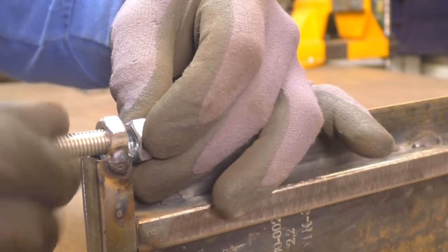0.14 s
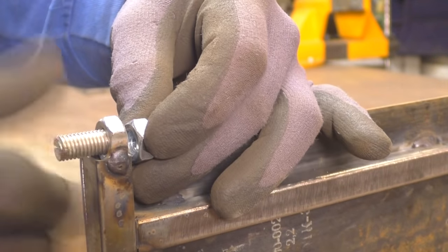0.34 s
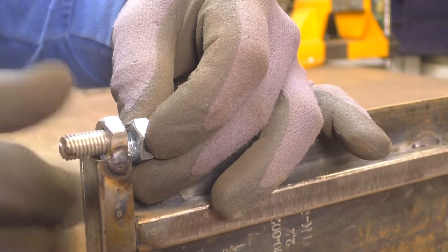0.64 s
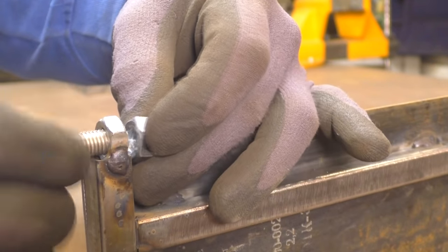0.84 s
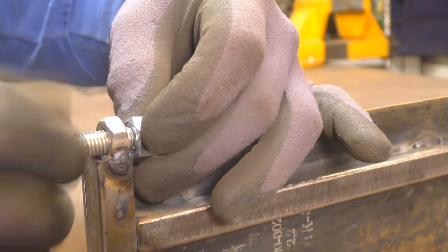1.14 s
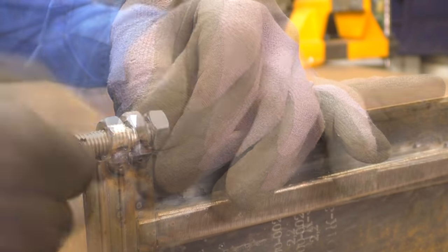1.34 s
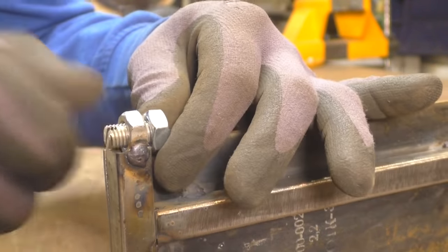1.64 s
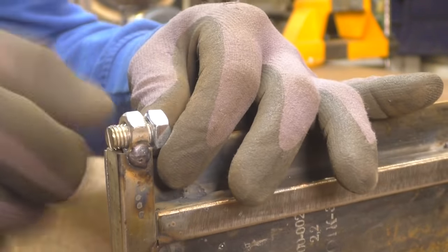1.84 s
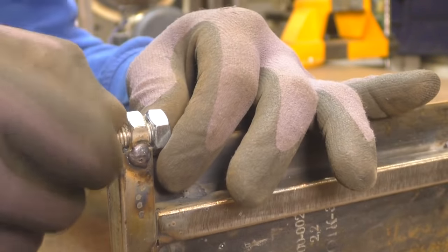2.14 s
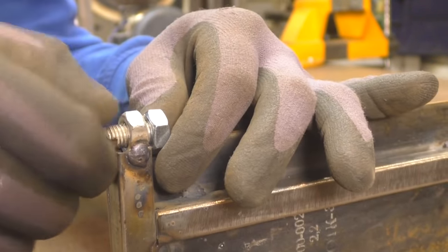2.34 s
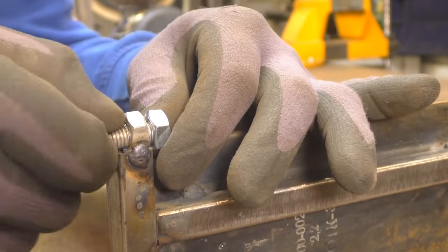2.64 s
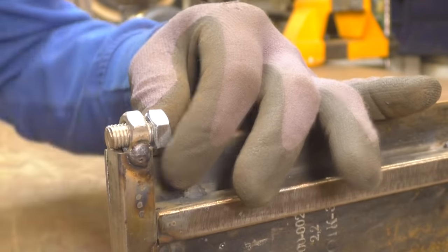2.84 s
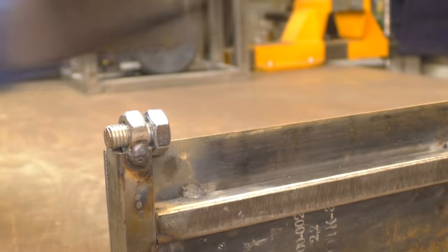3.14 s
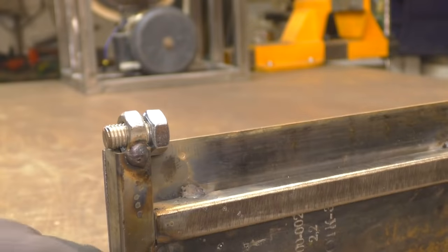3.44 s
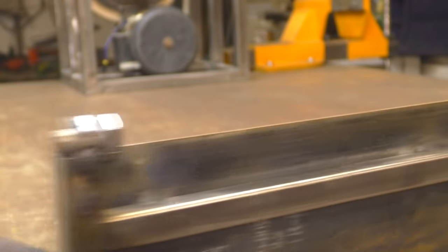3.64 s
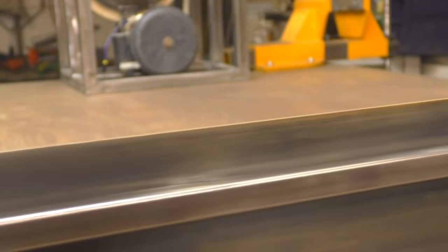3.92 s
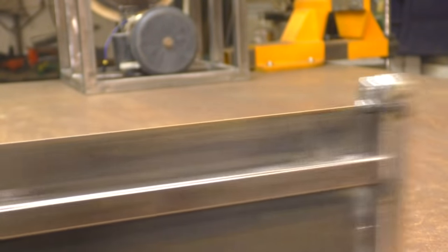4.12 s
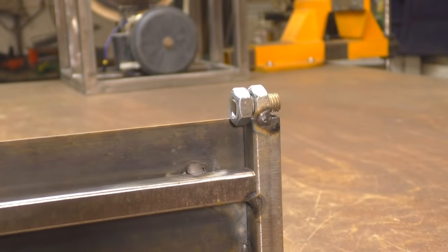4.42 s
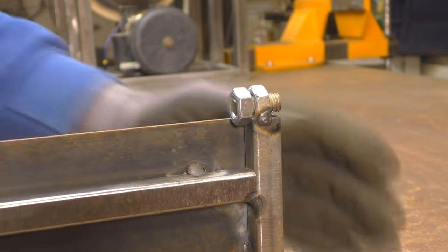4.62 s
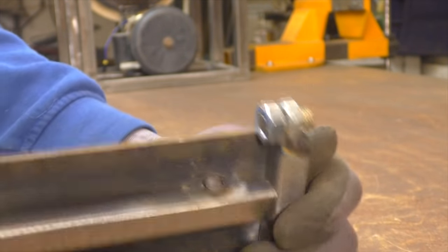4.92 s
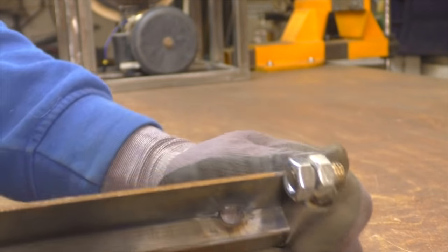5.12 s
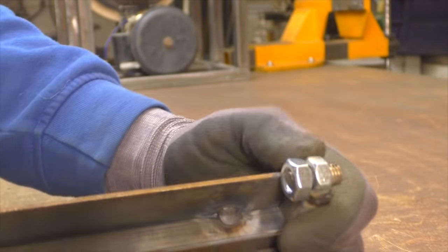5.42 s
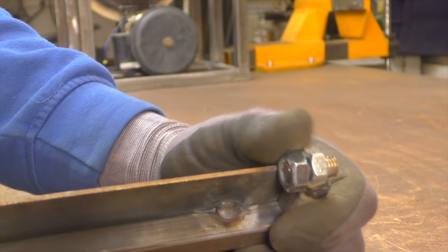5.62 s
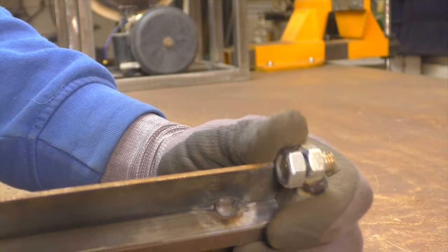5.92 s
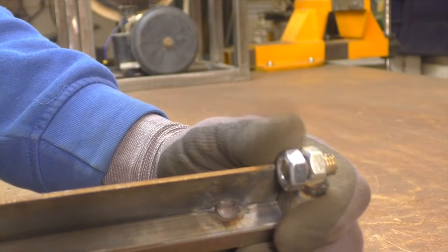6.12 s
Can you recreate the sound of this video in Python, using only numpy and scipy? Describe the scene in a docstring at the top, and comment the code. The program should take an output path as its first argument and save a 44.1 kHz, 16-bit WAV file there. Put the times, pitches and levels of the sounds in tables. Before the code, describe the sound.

A bolt is twisted by hand into a nut with small rattling clinks, then a steel frame scrapes along a wooden bench and thuds.

```python
"""A bolt rattles in its loose thread as gloved fingers twist it into a nut welded to a steel frame.
Tiny impacts make the steel clink and ring, and shake the wooden bench below. The frame is then
dragged along the bench, tipped up with two thuds and rubbed by a thumb. Now and then one steel note
sings out. It all happens close by, a little to the right, in a faintly humming workshop."""
import sys
import numpy as np
from scipy import signal
from scipy.fft import rfft, irfft, next_fast_len
from scipy.io import wavfile

SR = 44100
rng = np.random.default_rng(int(sys.argv[2]) if len(sys.argv) > 2 else 0)


def master_out(mix):
    """Clip the mix to full scale and print it as 16-bit PCM to the path in sys.argv[1]."""
    frames = np.transpose(np.atleast_2d(mix))
    ceiling = np.clip(frames, -1, 1)
    pcm = np.round(ceiling * 32767).astype(np.int16)
    wavfile.write(sys.argv[1], SR, pcm)


N = 276374
TIME = np.arange(N) / SR
FFT_SIZE = next_fast_len(N + SR)
FFT_HZ = np.maximum(np.fft.rfftfreq(FFT_SIZE, 1 / SR), 1)

# The frame's slide along the bench. Each row: time in seconds, scrape level in dB, treble and rumble
# in dB above the scrape, rumble pitch in Hz. Levels in all tables are relative: the mix scales them.
SLIDE_PATH = [(3.601, -69, -7, -10, 203), (3.652, -47, -8.5, 5, 189), (3.723, -33, -8.5, 5, 333),
              (3.8, -26.5, -16, -7, 252), (3.865, -28.5, -16.5, -3, 149), (3.96, -29.5, -15.5, -4.5, 152),
              (4.01, -29.5, -8.5, -2.5, 195), (4.07, -29.5, -11.5, -2, 212), (4.14, -29, -11, -6, 310),
              (4.18, -29.5, -13, -1.5, 350), (4.23, -32.5, -14.5, -5.5, 345), (4.288, -31, -17, -5, 392),
              (4.365, -37.5, -13.5, 4, 375), (4.4, -38.5, -11.5, 5, 470), (4.438, -41.5, -12, 6, 493),
              (4.506, -64.5, -22, -9, 212), (4.559, -65, -8, -2, 176)]


def from_db(db):
    """Turn decibels into a gain to multiply by."""
    return 10 ** (np.asarray(db) / 20)


def unit_level(x):
    """Scale a signal to an average (rms) level of 1."""
    return x / np.sqrt(np.mean(x ** 2) + 1e-20)


def curve(points):
    """Join (Hz, value) points to give a value at every frequency."""
    hz, values = np.transpose(points)
    return np.interp(np.log(FFT_HZ), np.log(hz), values)


def keep_band(x, order, hz, kind="band"):
    """Keep the lows, the highs or a band; a higher order cuts more sharply."""
    return signal.sosfilt(signal.butter(order, hz, kind, fs=SR, output="sos"), x)


def colour(x, db):
    """Turn each frequency up or down by db, with no ringing ahead of a hit (minimum phase)."""
    cepstrum = irfft(db * np.log(10) / 20, FFT_SIZE)
    cepstrum[1:FFT_SIZE // 2] *= 2
    cepstrum[FFT_SIZE // 2 + 1:] = 0
    return irfft(rfft(x, FFT_SIZE) * np.exp(rfft(cepstrum)), FFT_SIZE)[..., :x.shape[-1]]


def resonance(hz, width_hz):
    """A filter that rings at one pitch; the narrower it is, the longer it rings."""
    r = np.exp(-np.pi * width_hz / SR)
    return (1 - r * r) / 2 * np.array([1, 0, -1]), [1, -2 * r * np.cos(2 * np.pi * hz / SR), r * r]


def gliding_ring(x, times, pitches, width_hz):
    """Send x through a resonance whose pitch moves over time."""
    out, state = np.zeros(N), np.zeros(2)
    for i in range(round(times[0] * SR), round(times[-1] * SR), 256):
        hz = np.interp(i / SR, times, pitches)
        out[i:i + 256], state = signal.lfilter(*resonance(hz, width_hz), x[i:i + 256], zi=state)
    return out / np.sqrt(np.mean(out[out != 0] ** 2))


def wobble(db, rate_hz, size=N):
    """A gain that wanders by chance, about db either way."""
    r = np.exp(-80 * np.pi * rate_hz / SR)
    slow = signal.lfilter([1], [1, -2 * r, r * r], rng.standard_normal(size // 40 + 2002))[2000:]
    gain = from_db(2 * db * np.tanh(unit_level(slow) / 2))
    return np.interp(np.arange(size) / 40, np.arange(len(slow)), gain)


def grit(per_second, spread_db, lumpy_db):
    """Friction: tiny random impacts of uneven size, coming in lumps."""
    sizes = from_db(spread_db * np.minimum(rng.exponential(1, N), 4)) * rng.choice([-1, 1], N)
    lands = rng.random(N) < per_second / SR
    return unit_level(sizes * lands * wobble(lumpy_db, 62))


def workshop_hum():
    """Steady air noise and hiss, partly alike on the left and right."""
    # The tone of the air. Each row: frequency in Hz, level in dB.
    tone = [(15, -83), (25, -4.5), (130, -4), (242, -1.5), (394, -5.5), (591, -16.5), (734, -7.5),
            (796, -11), (1890, -4), (2110, -11), (2840, -9), (6050, -24.5), (11900, -19.5), (14400, -20.5),
            (16000, -24)]
    # How alike the two sides are. Each row: frequency in Hz, likeness from 0 to 1.
    likeness = [(60, 0.38), (180, 0.35), (550, 0.085), (1650, 0.23), (4970, 0.13), (10000, 0.58),
                (15000, 0.83)]
    # Which side is louder. Each row: frequency in Hz, left minus right in dB.
    balance = [(60, -3), (180, 2.5), (550, -5.5), (1650, -2), (4970, 2), (15000, -9)]
    common, apart = rfft(rng.standard_normal((2, FFT_SIZE)))
    alike = curve(likeness)
    common, apart = common * np.sqrt(1 + alike), apart * np.sqrt(1 - alike)
    left = (common + apart) * from_db(curve(tone) + curve(balance) / 2)
    right = (common - apart) * from_db(curve(tone) - curve(balance) / 2)
    air = unit_level(irfft(np.array([left, right]), FFT_SIZE)[:, :N])
    return from_db(-61.5) * wobble(0.35, 0.47) * air


def room_echo(x, fade_s=0.18, wall_cut_hz=1500):
    """Sound bounces between the walls on eight paths a side, duller on every round."""
    dull = np.exp(-2 * np.pi * wall_cut_hz / SR)
    wall = (1 - dull) / (1 - dull * np.exp(-2j * np.pi * FFT_HZ / SR))
    echoes = np.zeros((2, len(FFT_HZ)), complex)
    for k, delay_s in enumerate(rng.uniform(.004, .03, 16)):
        one_round = from_db(-60 * delay_s / fade_s) * wall * np.exp(-2j * np.pi * FFT_HZ * delay_s)
        echoes[k % 2] += one_round / (1 - one_round) * (-1) ** (k // 2)
    return irfft(rfft(x, FFT_SIZE) * echoes, FFT_SIZE)[:, :N] / np.sqrt(8)


def bench_ring(shake):
    """The wooden top rings at its own low pitches (its modes) when shaken, jolted or struck."""
    # The wood's modes. Each row: pitch in Hz, level under a thud in dB, level under shaking in dB,
    # seconds to fade by 60 dB.
    modes = [(134.7, -18.5, -26.5, 0.74), (158.5, -13, -12.5, 0.395), (208, 6, -8, 0.31),
             (227.8, 5.5, -9.5, 0.26), (274.6, -36, -6.5, 0.206), (319, -11, -4.5, 0.065),
             (371, 6.5, -1, 0.047), (456, -15, -10.5, 0.1)]
    # The frame's edge drops and judders. Each row: time in seconds, level in dB, extra bass in dB.
    thuds = [(5.005, -21.5, -25), (5.021, -10, -35), (5.042, -9.5, -28), (5.074, -10.5, -11),
             (5.095, -28, 4.5), (5.108, -42, -8), (5.44, -11.5, -9), (5.469, -26.5, 10),
             (5.515, -34.5, 9.5), (5.547, -43.5, 17.5)]
    # The rocking frame jolts the bench. Each row: time in seconds, level in dB, favoured pitch in Hz.
    jolts = [(0.233, -45, 457), (.378, -46, 457), (.515, -56, 457), (0.52, -40.5, 277), (0.706, -50, 277),
             (0.801, -46, 457), (0.809, -51.5, 208), (.965, -47, 457), (1.154, -41, 208), (1.191, -57, 277),
             (1.195, -44.5, 457), (1.345, -46, 240), (1.539, -37.5, 319), (1.546, -47.5, 208),
             (1.716, -33, 185), (1.72, -43, 457), (2.315, -45.5, 371), (2.61, -40, 371)]
    thud_s, thud_db, bass_db = np.transpose(thuds)
    jolt_s, jolt_db, jolt_hz = np.transpose(jolts)
    thud_at, jolt_at = np.round(thud_s * SR).astype(int), np.round(jolt_s * SR).astype(int)
    rough = shake * grit(4000, spread_db=5.0, lumpy_db=2.5) * from_db(-31.5)
    out = np.zeros(N)
    for hz, struck_db, shaken_db, fade_s in modes:
        force = rough * from_db(shaken_db) * wobble(4.6, 11.0)
        chance_db = rng.normal(0, 1, len(thuds))
        force[thud_at] += from_db(thud_db + struck_db - 17.5 + bass_db * (hz < 260) + chance_db)
        octaves_away = abs(np.log2(hz / jolt_hz))
        force[jolt_at] += from_db(jolt_db - 49 * octaves_away)
        r, angle = from_db(-60 / (fade_s * SR)), 2 * np.pi * hz / SR
        out += signal.lfilter([0, np.sin(angle)], [1, -2 * r * np.cos(angle), r * r], force + 1e-18)
    return keep_band(out, 4, [114, 566])   # the top gives off sound only in this band


def bench_rumble(shake):
    """The bench booms under the sliding frame; the pitch moves with the place of contact."""
    times, *_, pitches = np.transpose(SLIDE_PATH)
    broad = unit_level(keep_band(grit(1500, spread_db=3.5, lumpy_db=0.5), 3, [100, 600]))
    boom = gliding_ring(broad, times, pitches, width_hz=58)
    return shake * (from_db(-11.5) * broad + from_db(-5.0) * boom)


def brief_rings(swell_db_per_s=1500):
    """Single steel modes sing out briefly after a knock, twist or tap, or as a glove squeaks."""
    # The rings. Each row: time of the peak in seconds, pitch in Hz, level in dB, seconds to fade 60 dB.
    rings = [(0.049, 1168, -36.5, 0.15), (1.2, 1600, -45, 0.31), (1.34, 2314, -46.5, 0.42),
             (3.063, 1150, -54, 0.23), (4.187, 5800, -36, 0.032), (5.372, 1153, -57, 0.97),
             (5.569, 1070, -61, 0.16), (5.835, 3040, -57, 0.36), (5.838, 5300, -62, 0.05),
             (5.872, 5300, -56, 0.1), (5.865, 2070, -52, 0.23), (5.88, 3000, -50, 0.19),
             (5.895, 1150, -51, 0.27), (5.91, 5200, -64, 0.045), (5.925, 3060, -59, 0.081),
             (5.97, 2800, -52, 0.27), (5.981, 2115, -45.5, 0.23), (6.006, 2050, -32.5, 0.039),
             (6.006, 3950, -50, 0.082), (6.01, 5030, -55, 0.06), (6.02, 2800, -48, 0.086),
             (6.029, 2050, -48, 0.083), (6.05, 2050, -51, 0.2), (6.12, 2140, -49, 0.15),
             (6.13, 5060, -65, 0.067), (6.14, 2840, -53, 0.2), (6.218, 1130, -51.5, 0.32),
             (6.22, 730, -53, 0.13)]
    waver, rasp = wobble(.2, 120), wobble(5, 150)   # the pitch wavers by about 2 %, the level flutters
    out = np.zeros(N)
    for k, (peak_s, hz, db, fade_s) in enumerate(rings):
        near = slice(max(round((peak_s - .1) * SR), 0), round((peak_s + 1) * SR))
        age = TIME[near] - peak_s
        shape_db = np.where(age < 0, swell_db_per_s * age, -60 * age / fade_s)
        shift = k * 9001   # gives each ring its own flutter
        phase = 2 * np.pi * hz * np.cumsum(np.roll(waver, shift)[near]) / SR
        out[near] += from_db(db + shape_db) * np.roll(rasp, shift)[near] * np.sin(phase)
    return out


def edge_song():
    """Grit under the sliding edge makes three high, close pitches come and go."""
    # The song climbs as the frame swings round. Each row: time in seconds, pitch in Hz, level in dB.
    path = [(3.6, 9300, -81), (3.7, 9800, -56.5), (3.77, 9600, -47), (3.9, 9500, -52), (3.97, 9700, -52),
            (4.02, 10600, -50), (4.07, 12200, -56), (4.13, 12500, -65), (4.2, 12000, -66),
            (4.3, 11900, -70)]
    times, hz, db = np.transpose(path)
    force = grit(9000, spread_db=-3.0, lumpy_db=1.0)
    song = sum(wobble(2.5, 10) * gliding_ring(force, times, hz * ratio, width_hz=190)
               for ratio in (.96, 1, 1.05))
    return song * from_db(np.interp(TIME, times, db) - 1.0)


def frame_shimmer(x, fade_s=0.17):
    """The frame scatters each impact among countless small modes: a short, noisy stereo tail."""
    age = TIME[:SR // 5]
    tail = rng.standard_normal((2, len(age))) * from_db(-60 * age / fade_s)
    tail = keep_band(tail, 2, [500, 11800])
    tail /= np.sqrt(np.sum(tail ** 2, axis=1, keepdims=True))
    return irfft(rfft(x, FFT_SIZE) * rfft(tail, FFT_SIZE), FFT_SIZE)[:, :N]


def strokes(rows, fall_db_per_s, bench_lag_s=0.0074):
    """Hand strokes swell, hold and die. Gives gains for (body, treble, bite) and for the bench."""
    gains, shake = np.zeros((3, N)), np.zeros(N)
    shape_db = [-100, 0, -2.5, -2.5 - fall_db_per_s]
    for peak_s, swell_s, hold_s, db, treble_db, shake_db, *bite_db in rows:
        corners = peak_s + np.array([-4 * swell_s, 0, hold_s, hold_s + 1])
        near = slice(max(round(corners[0] * SR), 0), round((corners[2] + .4) * SR))
        age = TIME[near] - peak_s
        tail_db = np.where(age > 0, -15 - 0.37 * fall_db_per_s * age, -200)   # rattles on faintly
        body_db = np.maximum(np.interp(TIME[near], corners, shape_db), tail_db)
        late_db = np.interp(TIME[near] - bench_lag_s, corners, shape_db)
        # The treble swings more than the body, the bench less.
        gains[:, near] += from_db(db + np.array([body_db, treble_db + 1.43 * body_db,
                                                 sum(bite_db) + body_db]))
        shake[near] += from_db(db + shake_db + 0.74 * late_db)
    return gains, shake


def hits(rows, fade_s, rise_s=0.0043):
    """Each hit jumps up and dies away. Gives gains for (body, treble, bite)."""
    gains, age = np.zeros((3, N + SR)), TIME[:SR // 4]
    shape = from_db(-2.0 - 60 * age / fade_s) * (1 - np.exp(-age / rise_s))
    for start_s, db, treble_db, *bite_db in rows:
        at = round(start_s * SR)
        gains[:, at:at + len(age)] += shape * from_db([[db], [db + treble_db], [db + sum(bite_db)]])
    return gains[:, :N]


def clinks(force, spots=32):
    """Each tiny impact lands on one spot and clinks at that spot's own pitch."""
    landed = rng.integers(0, spots, len(force))
    pitches = np.linspace(np.sqrt(750), np.sqrt(15000), spots) ** 2
    return sum(signal.lfilter(*resonance(hz, 382 + 0.00077 * hz), force * (landed == k) + 1e-18)
               * (-1) ** k for k, hz in enumerate(pitches))


def leading_mode(hz, part, spread_s=0.012):
    """Where the steel bears decides which mode rings loudest. Gives the gain of the mode at hz."""
    # Moments when one mode stands out. Each row: time in seconds, its pitch in Hz, lift in dB.
    leads = [(0.161, 1750, 11.5), (.16, 2620, 20), (.16, 4060, 6), (.23, 3450, 2.5), (.26, 2790, 18),
             (.37, 4760, 10.5), (.4, 2790, 9.5), (.41, 4880, 8), (.51, 3450, 8.5), (.535, 1750, 8),
             (.54, 2790, 17), (0.671, 1750, 2), (.68, 3890, 12), (.72, 2620, 9), (.795, 1030, 11),
             (.8, 4060, 4), (.84, 3450, 16), (.87, 6430, 14), (.96, 1750, 7), (.97, 6090, -1),
             (1.0, 2790, 0), (1.01, 4880, 17), (1.1, 2620, -3), (1.13, 1030, 12), (1.18, 1630, 10),
             (1.19, 2790, 9), (1.19, 3030, 5), (1.31, 1150, 16), (1.33, 2330, 12), (1.33, 3450, 10.5),
             (1.48, 1750, 2), (1.5, 5860, 10), (1.545, 1150, 10), (1.69, 2790, 11), (1.69, 4060, 4),
             (1.83, 7200, 10), (1.87, 3450, -3), (1.9, 2330, 12.5), (2.211, 1915, 6.5), (2.275, 7200, 18),
             (2.29, 1630, 4), (2.3, 2330, 15), (2.3, 3030, 11), (2.61, 2330, 2), (5.87, 2330, 22),
             (5.885, 2727, 16), (5.9, 1840, 21), (5.97, 2330, 3), (5.97, 2960, 6), (6.0, 1600, 10),
             (6.15, 2330, 6), (6.21, 2960, 6)]
    time = np.arange(0, N + 64, 64) / SR
    lifts = [db * np.exp(-.5 * ((time - peak_s) / spread_s) ** 2)
             for peak_s, mode_hz, db in leads if abs(mode_hz / hz - 1) < .02]
    return np.repeat(from_db(sum(lifts)), 64)[:N][part] if lifts else 1


def steel(span_s, force, rub_gains, hit_gains, tone, modes, ring_db, wander_db):
    """Rubbed or struck steel clinks and rings; its modes trade strength as the contact point moves."""
    part = slice(round(span_s[0] * SR), round(span_s[1] * SR))
    clinking = colour(clinks(force[part]), curve(tone))
    # Three bands: the body is lowest, the treble highest, and the bite lies between them.
    middle = unit_level(keep_band(clinking, 4, [770, 5500]))
    body = keep_band(middle, 2, 2200, "low")
    treble = unit_level(keep_band(clinking, 4, 5500, "high"))
    bands = np.array([body, treble, middle - body])
    rubbed = np.sum(rub_gains[:, part] * bands, axis=0)
    struck = np.sum(hit_gains[:, part] * bands, axis=0)
    push = colour(rubbed + struck, -np.maximum(curve(tone), -30))   # evened out, it drives the modes
    out = np.zeros(N)
    out[part] = rubbed + from_db(-5) * struck   # a knock is more ring than click
    for hz, width_hz, db in modes:
        grip_hz = 30 + .006 * hz   # gloved fingers shorten the ring
        drive = push * wobble(wander_db, 18, len(push)) * leading_mode(hz, part)
        out[part] += from_db(ring_db + db) * signal.lfilter(*resonance(hz, width_hz + grip_hz), drive)
    return out


def dragged_frame():
    """The frame scrapes along the wood. Gives its sound and how hard it shakes the bench."""
    # The tone of the scrape. Each row: frequency in Hz, level in dB.
    tone = [(290, -43), (500, 17.5), (773, 7), (946, -3.5), (1030, 5), (1360, 5.5), (1670, 1.5),
            (1900, 3.5), (2260, 1.5), (4400, -7.5), (6140, -10), (12000, -3), (16000, -8)]
    # The sliding frame's modes. Each row: pitch in Hz, width in Hz, level in dB.
    modes = [(1096, 163, -6), (1400, 31, -17), (1780, 80, -14), (3300, 91, -25), (4290, 30, -16.5),
             (7660, 34, -15), (9130, 27, -12), (10100, 100, -26), (11560, 59, -12), (12300, 45, -21),
             (14100, 78, -26)]
    times, db, treble_db, rumble_db, _ = np.transpose(SLIDE_PATH)
    scrape, treble, shake = [from_db(np.interp(TIME, times, level_db, left=-200, right=-200))
                             for level_db in (db, db + treble_db, db + rumble_db)]
    gains, no_hits = np.array([scrape, treble, scrape]), np.zeros((3, N))
    force = grit(14000, spread_db=1.0, lumpy_db=0.66)
    return steel((3.5, 4.8), force, gains, no_hits, tone, modes, ring_db=9.5, wander_db=1.5), shake


def handled_frame():
    """Gloves and bench edge rub and tap the frame. Gives its sound and the shaking of the bench."""
    # The rubs. Each row: time of full pressure, swell and hold in seconds, level in dB,
    # then treble and bench shake in dB above that level.
    rubs = [(3.31, 0.02, 0.035, -50, -7.5, -11), (3.41, 0.15, 0.15, -62, -7.5, -2.5),
            (4.79, 0.052, 0.084, -53.5, -5.5, 0.5), (4.88, 0.059, 0.041, -57, 4.5, -40),
            (5.005, 0.025, 0.041, -37.5, -8.5, 8.5), (5.078, 0.029, 0.011, -37.5, -16, 5.5),
            (5.2, 0.72, 0.11, -63, 2, -24), (5.37, 0.073, 0.009, -54, -6.5, -25),
            (5.45, 0.042, 0.041, -49, -13, 7), (5.56, 0.041, 0.028, -54, -7, -12),
            (5.65, 0.1, 0.089, -62.5, -5.5, -2), (5.83, 0.067, 0.013, -59, -8, -5),
            (5.865, 0.03, 0.05, -51.5, -8.5, 1), (5.968, 0.006, 0.02, -54, -10, 3),
            (6.0, 0.035, .025, -51, -5, -9), (6.108, 0.025, 0.052, -53.5, -8.5, -2),
            (6.215, 0.023, 0.0074, -52, -21, -2)]
    # Small taps. Each row: start in seconds, level in dB, treble in dB above that level.
    taps = [(4.1834, -2, -8), (4.755, -14.5, -7), (4.761, -10.5, -7), (5.004, -19, -7), (5.0733, -15, -35),
            (5.44, -17.5, -35), (5.549, -28, -21), (5.8835, -40, 2), (5.965, -35, -10), (6.2108, -32, -28)]
    # The tone of the rubbing. Each row: frequency in Hz, level in dB.
    tone = [(290, -23), (500, -10), (631, -6), (868, 9), (1020, 1), (1320, 9), (1600, 7.5), (2040, 6.5),
            (7420, -18.5), (13100, -5.5), (16000, -36)]
    # The modes of the frame held in the hand. Each row: pitch in Hz, width in Hz, level in dB.
    modes = [(751, 23, 15), (1120, 21, 16), (1600, 26, -25), (1840, 29, -3), (2140, 23, -18), (2330, 73, 5),
             (2727, 12, 5.5), (2960, 13, -16)]
    rubbing, shake = strokes(rubs, fall_db_per_s=336)
    tapping = hits(taps, fade_s=0.013)
    force = grit(14000, spread_db=2.0, lumpy_db=1.0)
    return steel((3.2, 6.3), force, rubbing, tapping, tone, modes, ring_db=-5.5, wander_db=3.5), shake


def twisted_bolt():
    """Each twist rattles the bolt in its loose thread. Gives its sound and the shaking of the bench."""
    # The twists. Each row: time of full pressure, swell and hold in seconds, level in dB,
    # then treble, bench shake and bite in dB above that level.
    twists = [(0.0, 0.011, 0.011, -30, -19, -19.5, -7), (.045, 0.041, 0.012, -42, -6, -11, -2),
              (.226, 0.039, 0.0075, -33, -1, -11, 1.5), (.25, .012, 0.0062, -38.5, -14, -7, -14),
              (.366, 0.0085, 0.0077, -35.5, 4.5, -13, 5.5), (.395, 0.032, 0.011, -34, -7.5, -14, 2),
              (.502, 0.0097, 0.013, -31, -4, -10.5, -3.5), (.53, 0.026, 0.019, -33, -5.5, -20, 0),
              (.676, 0.03, 0.0065, -29.5, 1.5, -14, 4), (.705, .012, 0.011, -45.5, 0, -13, 1.5),
              (.781, 0.0024, 0.019, -29.5, -22, -17, 0.5), (.832, 0.04, 0.019, -35.5, 7.5, -10.5, 1),
              (.885, 0.017, 0.027, -58, 8, 5, 0), (.957, 0.013, 0.012, -30.5, 0, -17.5, -7),
              (.983, 0.04, 0.02, -34, 2, -12, 3.5), (1.045, 0.03, 0.037, -61, 6, -4, -6),
              (1.095, 0.017, 0.05, -31, -10, -16.5, -1), (1.182, 0.025, 0.0031, -34.5, -2.5, -7, -0.5),
              (1.22, 0.03, 0.023, -50, -8, -10, -4), (1.288, 0.013, 0.0061, -35, -14, -12, 1.5),
              (1.32, 0.042, 0.013, -30.5, -3.5, -20, 3), (1.37, 0.029, 0.023, -53.5, -15, -7, -13),
              (1.49, 0.087, 0.039, -32.5, -13.5, -14, -6), (1.63, 0.033, .02, -43, -27, -10, -5),
              (1.675, 0.037, 0.02, -34, -6.5, -7, 1.5), (1.866, 0.019, 0.004, -27, 1.5, -14.5, 0.5),
              (2.271, 0.034, 0.0065, -31, 0, -15.5, 8), (2.295, 0.012, 0.017, -36, -7.5, -21, -11),
              (2.6, 0.053, 0.0054, -32.5, -16, -9.5, -3), (2.66, 0.022, 0.02, -35.5, -26, -13.5, -7.5)]
    # The bolt knocks across the slack in the thread. Each row: start in seconds, level in dB,
    # then treble and bite in dB above that level.
    knocks = [(0.04, -18, -35, 2), (0.152, -31.5, -32, 3.5), (0.16, -37, -27, 11), (0.182, -29, -1, -3),
              (0.2185, -23, -5, 16.5), (0.356, -33, -20, -3), (0.365, -22, -1.5, 5), (0.496, -26, -3, -3),
              (0.508, -18, -17, -2), (0.641, -18, -27, -2), (.655, -25, -9, -2), (0.785, -21, -22, -9),
              (0.797, -14, 0, 4), (0.829, -33, -2, 10), (0.932, -25, -25, 8), (.94, -32, -23, 7),
              (1.0945, -20, 2.5, 9), (1.179, -17, -16, 9), (1.187, -20.5, -20, 12.5),
              (1.429, -21, -35, -20), (1.538, -15, -11, 2.5), (1.612, -32, -15, 8.5),
              (1.443, -21, -14, -17), (1.691, -18, -14, 0.5), (1.7146, -3.5, -21, -4.5),
              (1.825, -23.5, -1, 5), (1.832, -24.5, -3, -18), (2.206, -17.5, -11.5, 3.5),
              (2.212, -35, -11.5, -1), (2.444, -30.5, -33, -7), (2.7909, -11, -13.5, -5.5),
              (3.021, -30.5, -27, -7)]
    # The tone of the rattle. Each row: frequency in Hz, level in dB.
    tone = [(290, -44), (500, 17), (761, -17), (1140, 2.5), (1460, 1.5), (1740, -8.5), (2130, -1),
            (3980, 2.5), (6800, -23), (10800, -10.5), (12300, -20), (16000, -84)]
    # The modes of bolt, nut and frame lying down. Each row: pitch in Hz, width in Hz, level in dB.
    modes = [(1030, 8.3, 0.5), (1150, 6.6, 4), (1630, 21, -5), (1750, 11, 15.5), (1915, 21, 6.5),
             (2330, 76, 1), (2620, 48, 4), (2790, 13.5, 8), (3030, 14, -16), (3450, 30, 3),
             (3890, 7.8, 0.5), (4060, 9.5, -10.5), (4760, 7, 2), (4880, 7, 0.5), (5380, 27, -5.5),
             (5860, 29, -13), (6090, 9.4, -14), (6430, 8.7, -32.5), (7200, 14, -14.5), (8240, 54, -13.5),
             (9080, 42, -6), (10600, 67, -28), (11370, 170, -14), (12500, 150, -15)]
    rattling, shake = strokes(twists, fall_db_per_s=563)
    knocking = hits(knocks, fade_s=0.018)
    force = grit(28000, spread_db=1.5, lumpy_db=0.8)
    return steel((0, 3.2), force, rattling, knocking, tone, modes, ring_db=0.0, wander_db=5.5), shake


def scene():
    """Bolt, frame and bench sound close by, to the right, with the room and the hum around them."""
    # Where the work sits between the ears. Each row: frequency in Hz, left minus right in dB.
    balance = [(60, -4), (120, -0.5), (240, -6), (480, -13), (950, -5.5), (1890, -5.5), (3770, -5.5),
               (7520, -8.5), (15000, 0.5)]
    bolt, bolt_shake = twisted_bolt()
    frame, frame_shake = handled_frame()
    slide, slide_shake = dragged_frame()
    shake = from_db(-2.5) * bolt_shake + frame_shake + from_db(-3.5) * slide_shake
    wood = bench_ring(shake) + bench_rumble(slide_shake)
    metal = from_db(-9.0) * bolt + from_db(-2.5) * frame + from_db(-5.5) * slide + edge_song()
    direct = metal + from_db(-8) * frame_shimmer(metal) + brief_rings() + wood
    left, right = direct + from_db(-1.5) * room_echo(metal + wood)
    lean_db = curve(balance) / 2
    return np.array([colour(left, lean_db), colour(right, -lean_db)]) + workshop_hum()


def record(dry):
    """Cut the very highest treble steeply."""
    return signal.sosfilt(signal.cheby2(14, 70, 16600, fs=SR, output="sos"), dry)


dry = scene()
out = record(dry)
master_out(out)
```